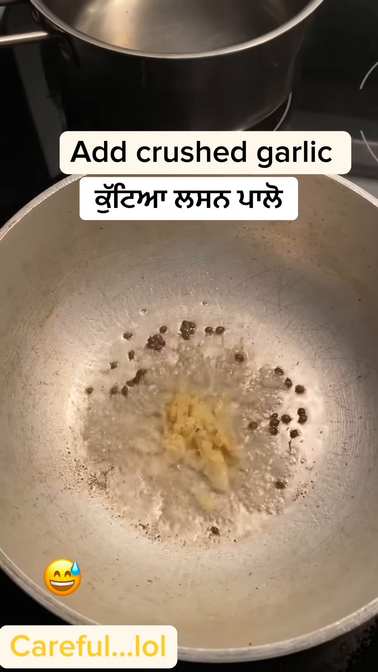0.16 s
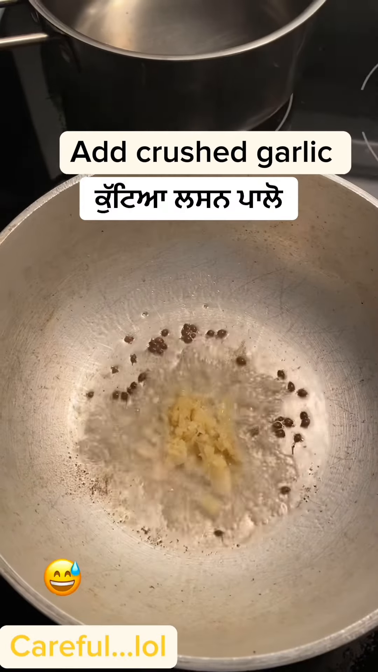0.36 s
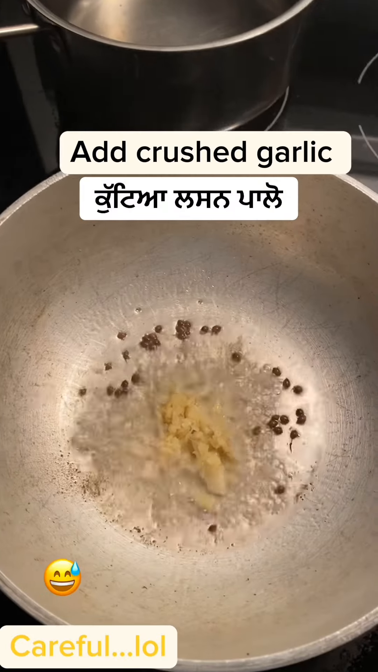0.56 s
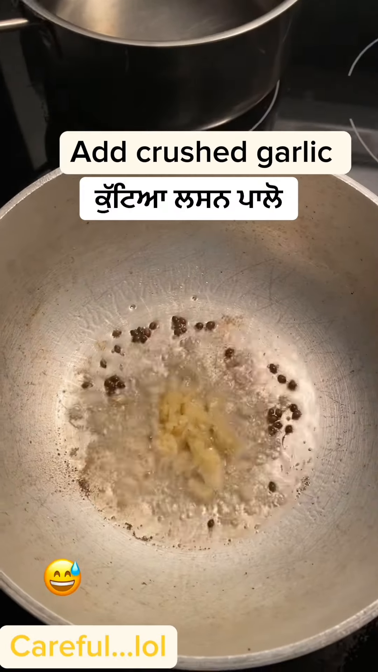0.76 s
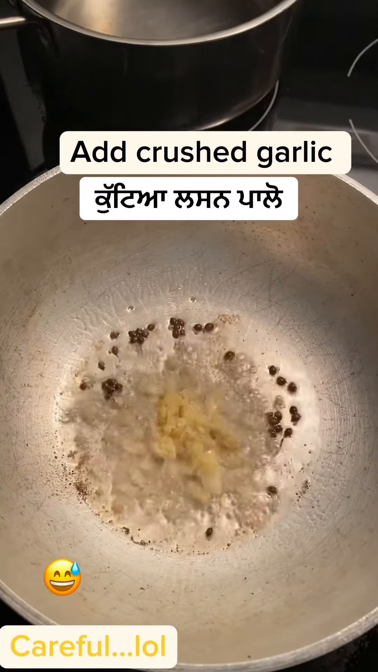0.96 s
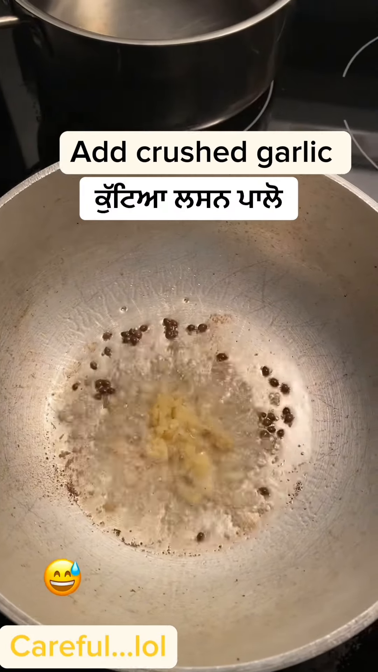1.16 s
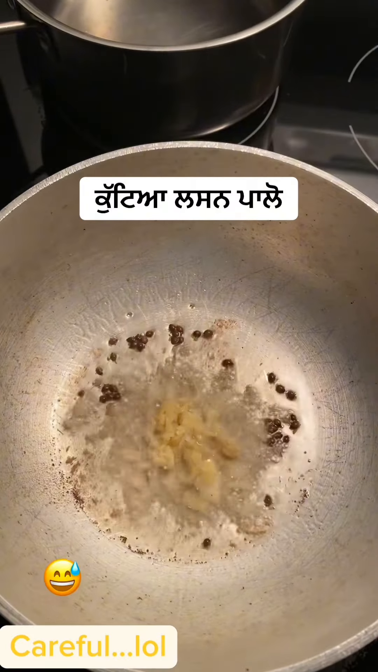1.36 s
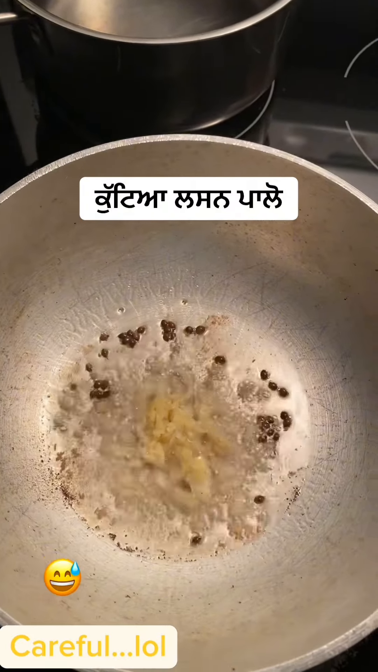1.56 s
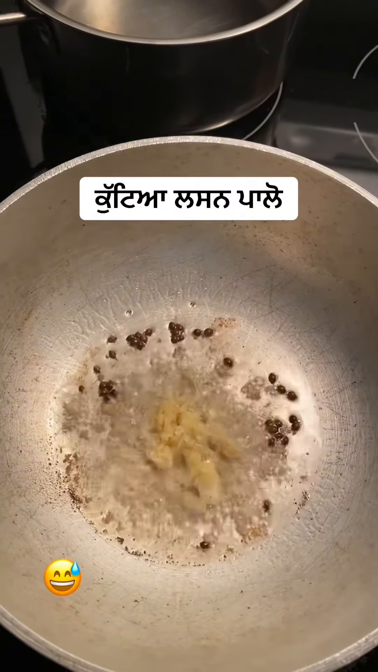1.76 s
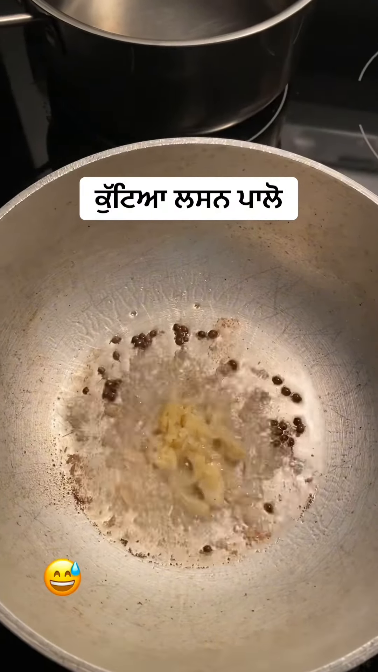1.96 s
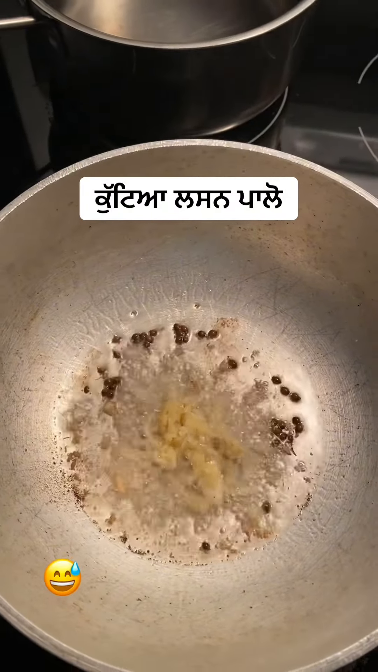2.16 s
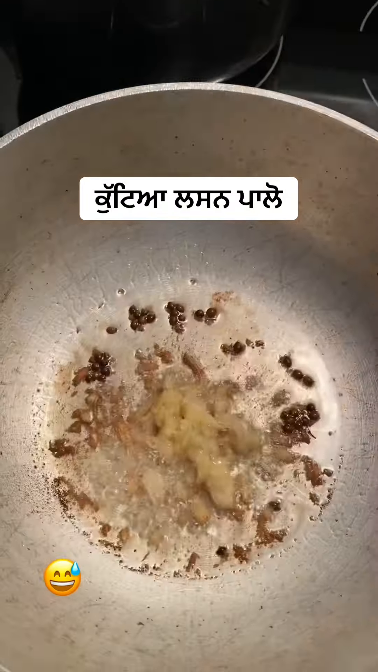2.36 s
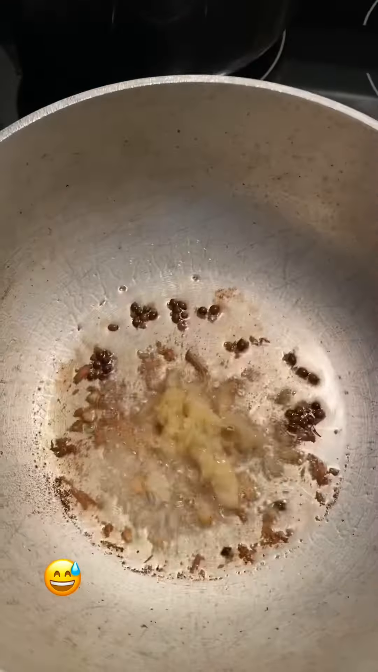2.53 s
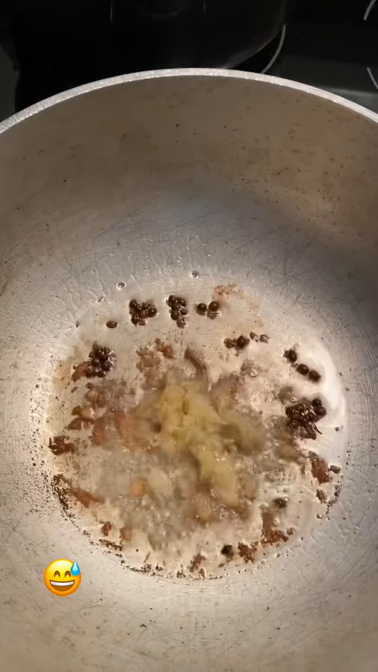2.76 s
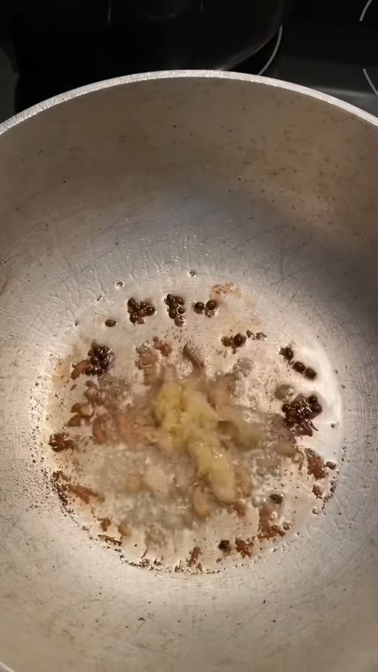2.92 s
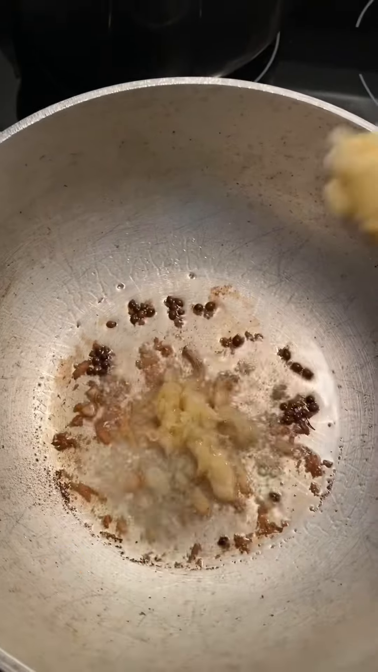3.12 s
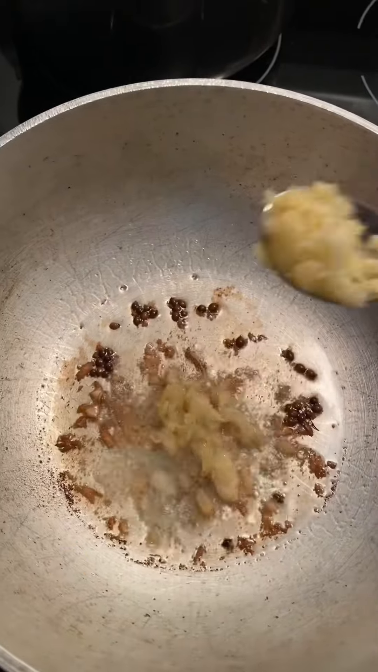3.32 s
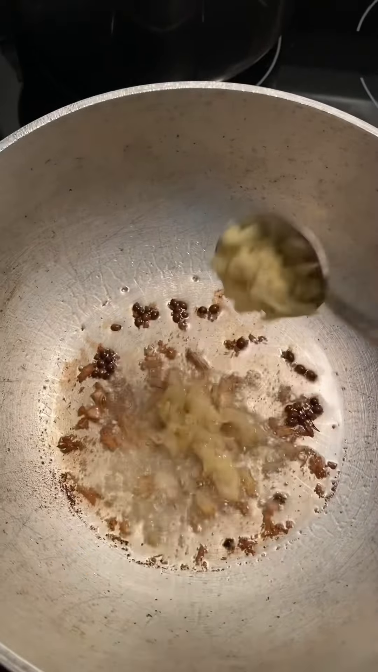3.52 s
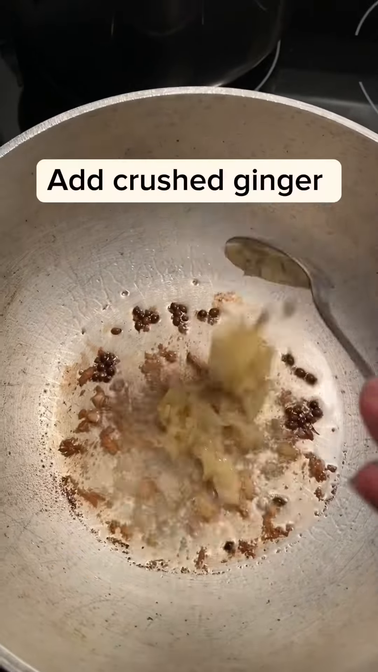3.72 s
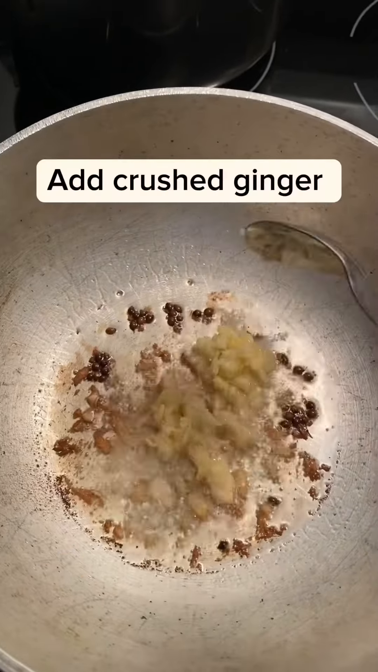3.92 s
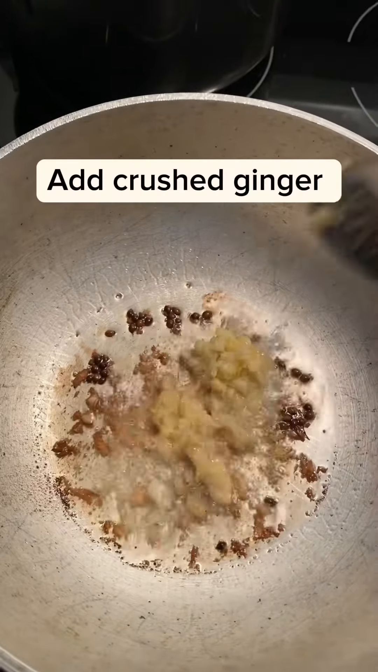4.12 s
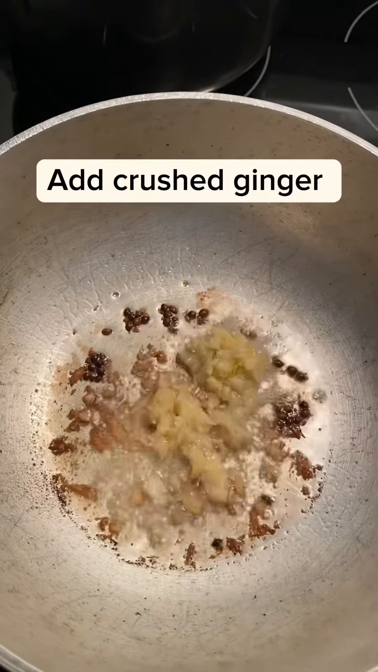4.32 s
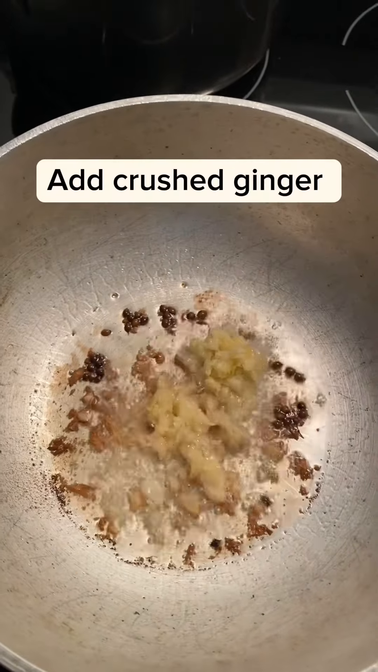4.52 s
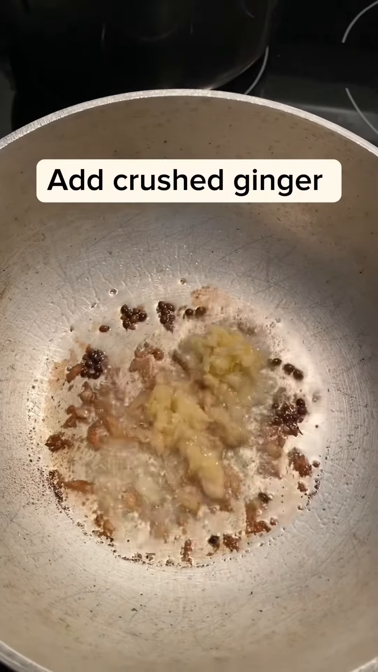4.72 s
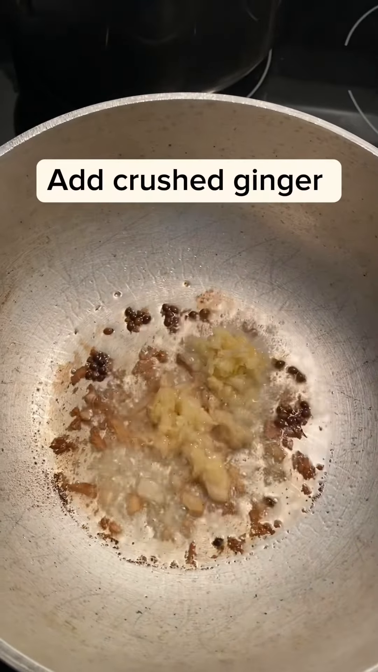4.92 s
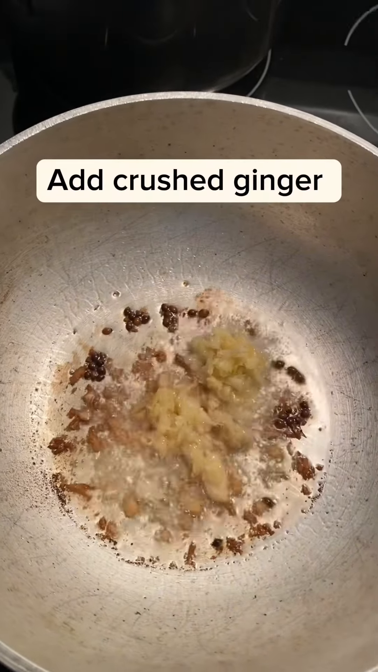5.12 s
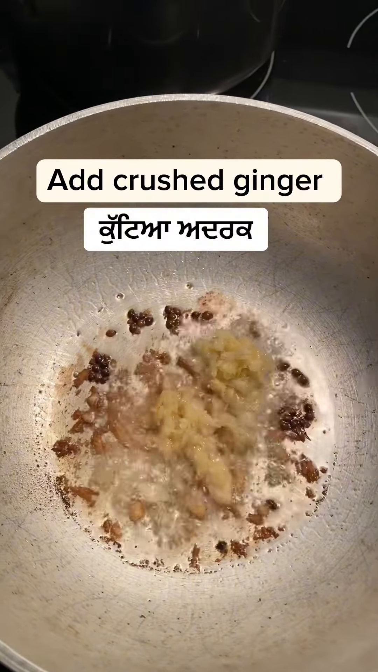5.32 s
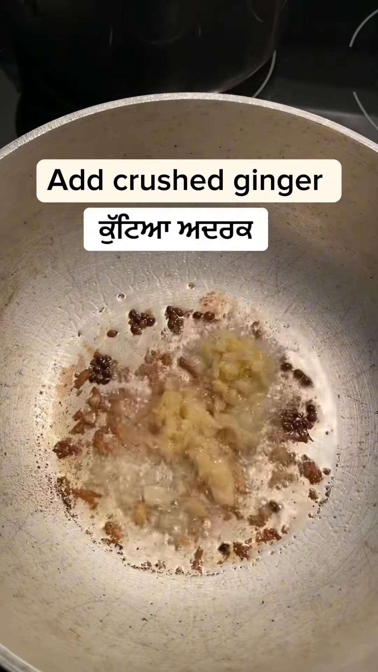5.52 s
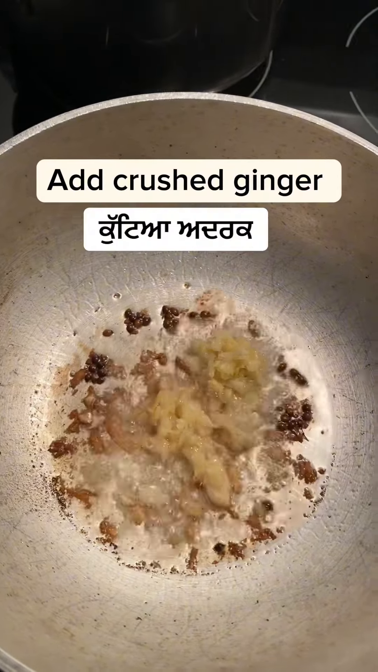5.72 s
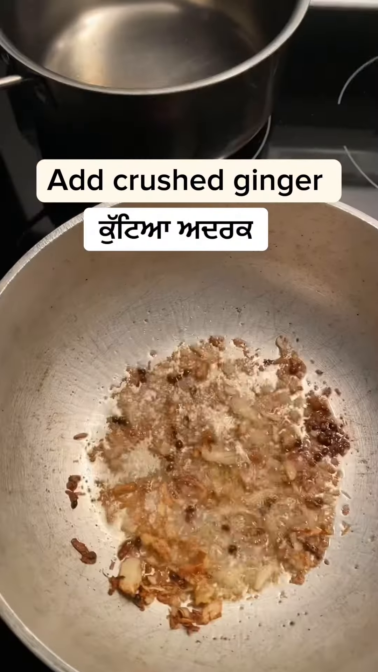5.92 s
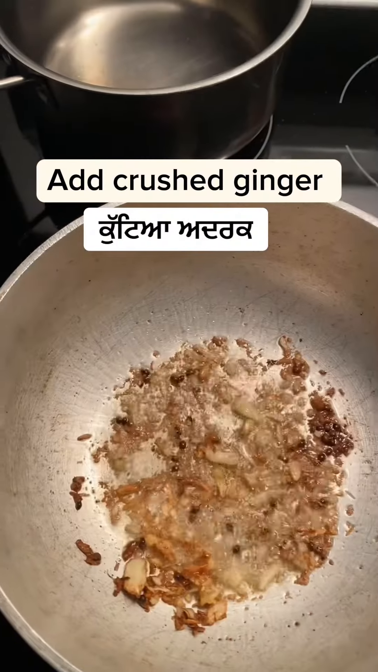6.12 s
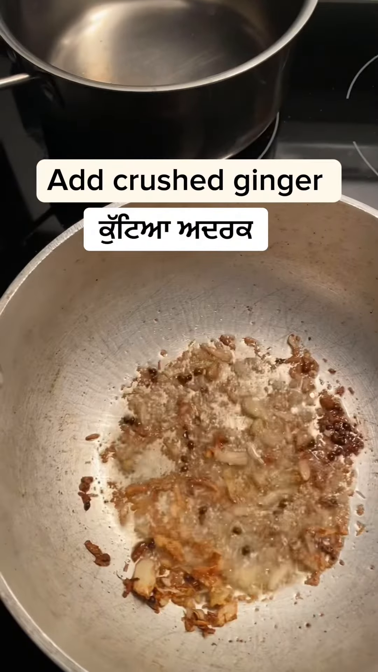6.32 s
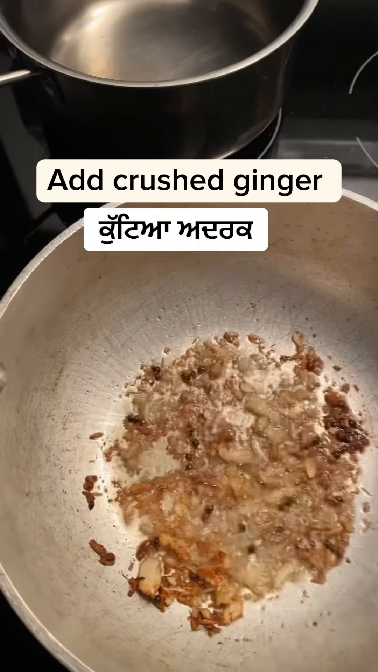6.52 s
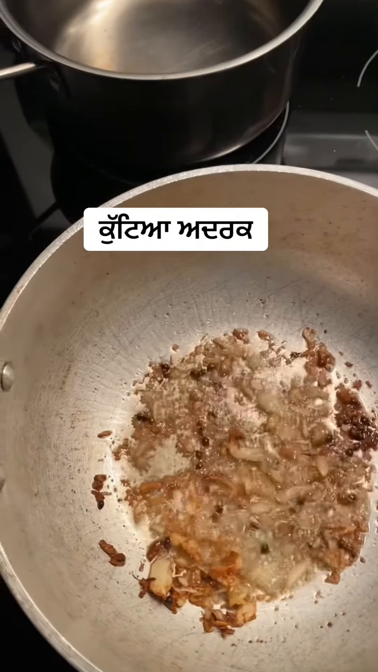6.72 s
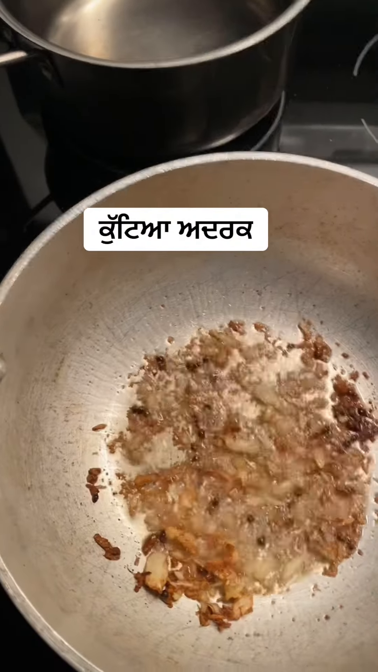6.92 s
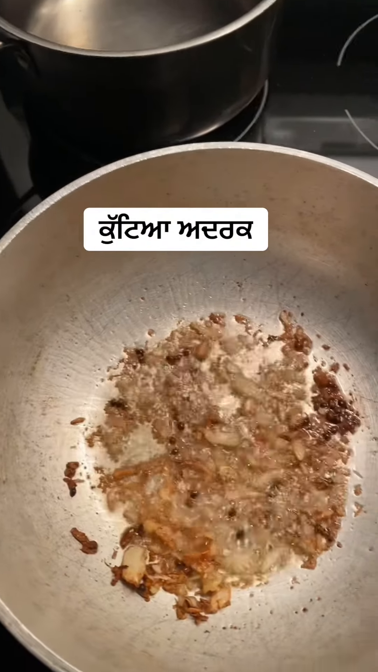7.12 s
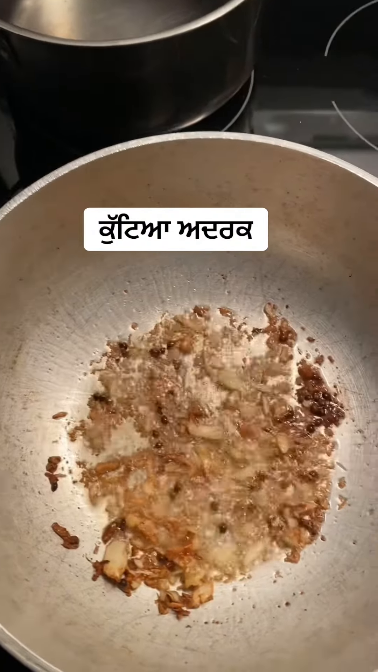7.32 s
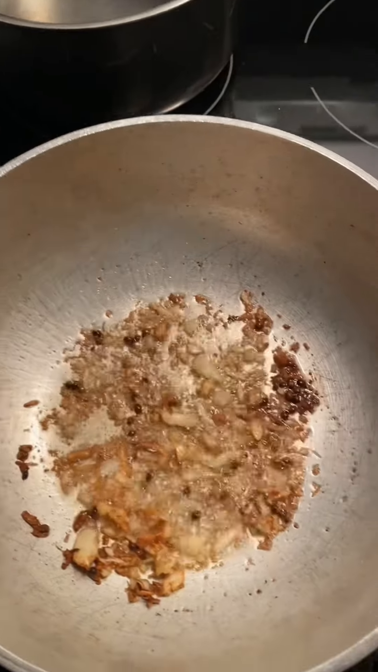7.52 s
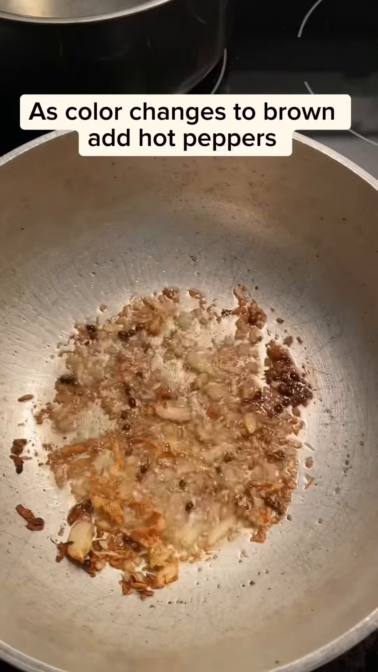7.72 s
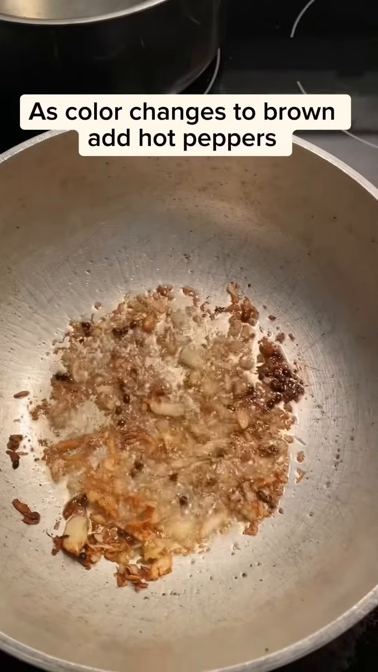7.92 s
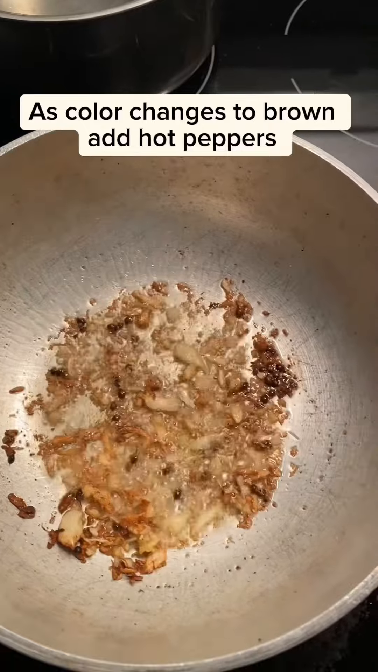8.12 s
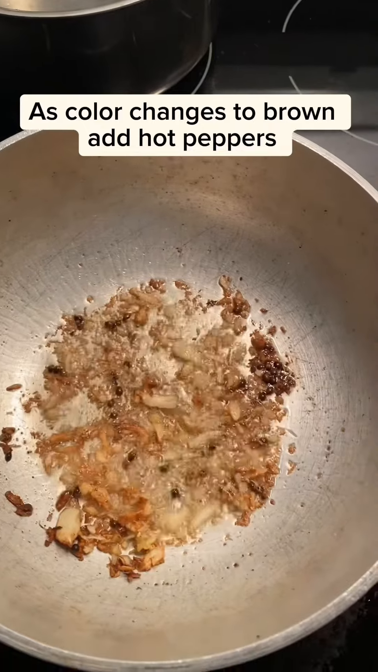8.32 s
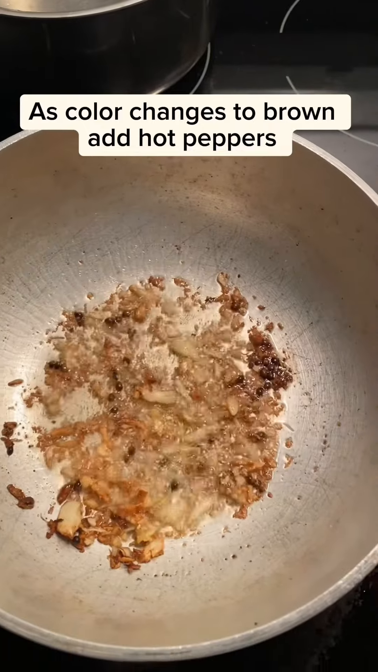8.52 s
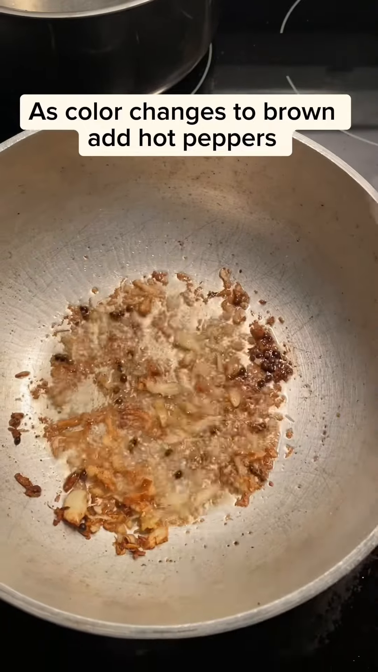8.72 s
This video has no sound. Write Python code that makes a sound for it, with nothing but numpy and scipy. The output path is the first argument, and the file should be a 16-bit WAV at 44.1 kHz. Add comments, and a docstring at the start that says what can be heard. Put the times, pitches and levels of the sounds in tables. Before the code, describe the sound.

Garlic and ginger sizzle and pop in hot oil, surging as the ginger lands, over a faint fan hum.

```python
"""Crushed garlic and then ginger sizzle in hot oil in a deep steel pan, heard from close above.
Countless tiny bursts make a high mist, a fizz and a lower bubbling, which change abruptly by stage.
Water drops flash to steam and pop, a few bubbles ping, and the air in the pan rings along.
A spoon knocks off the paste and an extractor fan hums behind. Twice the sound drops out briefly."""
import sys
import numpy as np
from scipy import signal
from scipy.fft import rfft, irfft, next_fast_len
from scipy.io import wavfile

SR = 44100
rng = np.random.default_rng(int(sys.argv[2]) if len(sys.argv) > 2 else 0)


def pcm_store(signal):
    """Save signal as 16-bit PCM."""
    levels = np.round(np.clip(np.atleast_2d(signal), -1, 1) * 32767)
    wavfile.write(sys.argv[1], SR, levels.astype(np.int16).T)


N = 386737

# The tone of the finest spray, of the fizz and of the larger bubbles. Each row: pitch in Hz, level in dB.
MIST_TONE = [(5000, -20), (7200, 5.5), (8200, 4.5), (9500, 6.5), (12000, 6), (14000, 4.5), (15700, 3.5)]
FIZZ_TONE = [(2000, -47), (3800, -9), (4500, -1.5), (5000, 3), (6000, 3), (7300, 1.5), (8500, -23),
             (11000, -28)]
BUBBLE_TONE = [(200, -18), (500, -13.5), (720, -13), (830, -5), (1000, -7.5), (1240, -12), (1750, -7),
               (2400, -3.5), (3300, -4), (4300, -6), (6000, -19)]
def sizzle(mist_db, fizz_db, bubble_db, crackle_db):
    """Hot oil makes tiny bursts in three sizes, which swell together and share one sparser crackle."""
    liveliness = amp(np.minimum(crackle_db, -2))
    crackle = liveliness * random_clicks(per_s=550, spread_db=3.3)
    swell_db = 2 * liveliness * drift(7)
    crackle_gain = np.sqrt(np.mean(liveliness ** 2))
    out = 0
    for level_db, tone, per_s, decay_ms in [(mist_db + 9.5, MIST_TONE, 6000, .15),
                                            (fizz_db + 7.0, FIZZ_TONE, 5000, .15),
                                            (bubble_db + 3.5, BUBBLE_TONE, 2500, .2)]:
        hiss = bursts(random_clicks(per_s, spread_db=2.5), decay_ms, tail_ms=3.5, tail_db=-8)
        hiss *= amp(swell_db + 1.1 * drift(20))
        sparks = crackle_gain * bursts(crackle, decay_ms=.1, tail_ms=2.0, tail_db=-18)
        out = out + amp(level_db) * rms_one(colour(hiss + sparks, tone, size=2048))
    return out

def random_clicks(per_s, spread_db):
    """Clicks at random moments, many small and a few large."""
    sizes = amp(spread_db * np.minimum(rng.exponential(1, N), 4))
    return sizes * (rng.random(N) < per_s / SR)

def bursts(clicks, decay_ms, tail_ms, tail_db):
    """Each click opens a puff of noise with a faint tail. Rows: both sides, left only, right only."""
    fast, slow = np.exp(-1000 / (SR * np.array([decay_ms, tail_ms])))
    power = clicks ** 2 + 1e-18
    puff = signal.lfilter([1], [1, -fast], power)
    tail = amp(2 * tail_db) * signal.lfilter([1], [1, -slow], power)
    return rms_one(np.sqrt(puff + tail) * rng.standard_normal((3, N)))

# Brief flare-ups of the frying. Each row: middle in seconds, boost in dB, half length in seconds.
FLARE_UPS = [(0.088, 3, 0.027), (0.385, 0, 0.084), (1.196, 2, .03), (1.82, 2.5, 0.045), (1.992, 6.5, 0.021),
             (4.11, 1.5, .04), (5.16, 3, 0.055)]
def frying_oil(vigour_db, mist_boost_db, bubble_boost_db, crackle_db):
    """The sizzle flares up now and then, and the wet ginger throws up a rush of mist as it lands."""
    fizz_db = vigour_db + sum(bump(*row) for row in FLARE_UPS)
    splash_db = bump(middle_s=3.76, height=4.5, half_s=.029)
    return sizzle(fizz_db + mist_boost_db + splash_db, fizz_db, fizz_db + bubble_boost_db, crackle_db)

# The loudest pops. Each row: start in seconds, then levels in dB of snap, crack, body and plop.
LOUD_POPS = [(0.058, -8, -8.5, -19.5, -32), (0.072, -15, -38, -34, -44), (0.099, -11, -5, -25, -37),
             (0.1335, -25, -22, -33, -51), (0.1441, -13, -10, -19, -34), (0.1615, -22, -30, -31, -42),
             (0.2344, -19, -28, -26, -34), (0.2945, -7, -16, -35, -44), (0.3251, -9, -8, -20.5, -35),
             (0.3467, -28, -26, -28, -39), (0.4633, -22, -23, -23.5, -40), (0.4845, -14, -14, -48, -39),
             (0.8602, -5.5, -32, -26, -35), (0.9367, -18, -17, -27, -33), (1.0127, -25, -28, -35, -40),
             (1.0433, -10, -12, -23.5, -33), (1.068, -28, -20, -39, -42), (1.0985, -22, -36, -30, -38),
             (1.1895, -10, -24, -25.5, -32), (1.2216, -28, -27, -36, -58), (1.2525, -12, -19, -30, -40),
             (1.2833, -9, -19, -19, -27), (1.324, -18, -13.5, -19, -30.5), (1.4338, -24, -28, -28, -34),
             (1.7049, -9, -28, -27, -37), (1.7897, -5, -13, -22, -35.5), (1.836, -7, -17, -27, -32.5),
             (1.9587, -2.5, -13, -20, -25.5), (2.0042, -3, -16, -24, -29.5), (2.021, -12, -18, -33, -31),
             (2.0375, -23, -27, -22.5, -32), (2.09, -24, -16, -36, -36), (2.1235, -22, -15, -35, -30),
             (2.1764, -9, -16, -25, -32), (2.2179, -1, -15, -23, -34), (2.2828, -8, -16, -23, -30),
             (2.3803, -8, -35, -39, -51), (2.3955, -8, -21, -45, -53), (2.4119, -9, -23, -49, -55),
             (2.4234, -20, -22, -45, -54), (2.4793, -8, -21, -34, -46), (2.5384, -2, -27, -49, -41),
             (2.5756, -7, -33, -42, -56), (2.621, -10, -18, -35, -46), (2.6417, -1, -29, -33, -44),
             (2.6548, -8, -24, -33, -40), (2.6585, -28, -10, -25, -36), (2.6703, 2, -20, -12, -16.5),
             (2.6899, -27, -30, -46, -42), (2.7684, -5, -37, -42, -47), (2.7966, -9, -29, -56, -56),
             (2.8062, -9, -34, -44, -49), (2.8204, -26, -19, -32, -50), (2.8478, -5, -17.5, -35, -50),
             (2.9017, -13, -17, -43, -59), (2.9081, -7, -21, -30, -49), (2.9388, -27, -18, -39, -48),
             (2.9558, -9, -27, -46, -46), (2.9865, -8, -18, -29, -48), (3.0549, -10, -38, -51, -51),
             (3.0692, -9, -37, -45, -52), (3.1182, 3.5, -15.5, -29, -40), (3.2358, -7, -38, -39, -37),
             (3.3116, -17, -24, -45, -45), (3.3318, 3.5, -12.5, -21.5, -40), (3.3385, -2, -27, -37, -48),
             (3.3705, -23, -19, -29.5, -45), (3.3843, -29, -18, -38, -51), (3.438, -43, -21, -29.5, -51),
             (3.4993, -5.5, -20, -51, -48), (3.5349, -34, -36, -29, -52), (3.5666, -7, -34, -38, -53),
             (3.8333, -13, -17, -15.5, -40), (3.871, -11, -21, -19, -43), (3.8832, -6, -9, -22, -32),
             (3.9268, -3, -8, -16, -29), (3.9714, -15, -14, -14.5, -31), (3.9886, -14, -11, -24, -30),
             (4.0072, -14, -23, -20, -36), (4.032, -16, -20, -19, -31), (4.056, -12, -16, -20, -32),
             (4.0863, -16, -29, -21.5, -47), (4.1217, -16, -0.5, -19, -36), (4.1316, -18, -3, -37, -37),
             (4.1592, -13, -26, -21, -35), (4.1864, -21, -9, -18, -33), (4.2055, -20, -26, -34, -35),
             (4.2221, 1.5, -8, -17, -34), (4.2594, -10, -8.5, -31, -43), (4.3213, -11, -33, -37, -53),
             (4.3487, -18, -9, -29, -30), (4.4587, -13, -15, -31, -50), (4.4738, -19, -12, -36, -43),
             (4.5014, -20, -14, -34, -39), (4.5146, -13, -22, -31, -52), (4.6066, -10, -6, -38, -41),
             (4.611, -10, -8, -36, -49), (4.6156, -7, -10, -25, -53), (4.6734, -3, -19, -31, -50),
             (4.6826, -14, -10, -26, -57), (4.7276, -1.5, -6, -26, -33.5), (4.7975, -17, -25, -31, -39),
             (4.8377, -17, -23, -29, -39), (4.8798, -3, -8.5, -29, -42), (4.9435, -16, -26, -43, -55),
             (5.0452, 0.5, -17, -39, -58), (5.0566, -5, -23, -31, -47), (5.115, -6, -14, -47, -42),
             (5.1487, -7, -2, -30, -55), (5.1577, -13, -12, -23, -42), (5.189, -30, -11, -36, -43),
             (5.3227, 2.5, -10, -23, -47), (5.3416, 1, -30, -39, -51), (5.4365, -20, -25, -24, -36.5),
             (5.4739, -22, -14, -49, -56), (5.4914, -4, -17, -28, -42), (5.5832, -17, -20, -31, -40),
             (5.6392, -28, -24, -23, -51), (5.6516, -5, -30, -36, -58), (5.7084, -11, -28, -37, -54),
             (5.7194, -0.5, -12, -25, -54), (5.7854, -11, -23, -27, -36.5), (6.1665, -16, -30, -32, -43),
             (6.174, -30, -47, -28.5, -41), (6.3584, -24, -30, -41, -39), (6.5923, -15, -30, -38, -58),
             (6.6591, -38, -23, -48, -52), (6.9632, -10.5, -26, -53, -56), (7.0272, -13, -35, -46, -58),
             (7.0723, -16, -27, -37, -34), (7.0982, -21, -46, -47, -51), (7.6029, -30, -53, -38, -41),
             (7.8423, -12, -36, -48, -60), (8.276, -39, -49, -37, -48), (8.5812, -28, -24, -36, -53)]
# The tone of a pop's body and of its low plop. Each row: pitch in Hz, level in dB.
BODY_TONE = [(800, -18), (1250, -6), (1600, -0.5), (2300, 1.5), (3150, 1.5), (3800, -3.5), (6000, -28.5)]
PLOP_TONE = [(120, -26), (300, -11), (600, -3), (830, 0), (1050, -5), (1300, -17), (2200, -30)]
def steam_pops(small_rows):
    """Water drops, big and small, flash to steam: a thin snap and a crack over a body and a low plop."""
    events = [*LOUD_POPS, *small_rows]
    out = np.zeros((3, N + SR))
    snaps = puffs(len(events), MIST_TONE, rise_ms=.18, tail_ms=4.5, tail_db=-10)
    cracks = puffs(len(events), FIZZ_TONE, rise_ms=.22, tail_ms=6.0, tail_db=-9)
    bodies = puffs(len(events), BODY_TONE, rise_ms=.25, tail_ms=6.0, tail_db=-8)
    plops = puffs(len(events), PLOP_TONE, rise_ms=.25, tail_ms=5.0, tail_db=-9)
    for (start_s, *levels_db), *parts in zip(events, snaps, cracks, bodies, plops):
        gains = amp(levels_db) * [1, -1, 1, -1]  # flipped so parts close in pitch add up
        add_at(out, start_s, np.tensordot(gains, parts, 1))
    return out[:, :N]

# When a pop's sharp click comes, in milliseconds: both sides, left only, right only.
CLICK_DELAYS_MS = [.25, .55, .8]
def puffs(count, tone, rise_ms, tail_ms, tail_db):
    """One part of each pop: a sharp click in a short puff of noise, on all three rows."""
    ms = np.arange(SR // 50) / SR * 1000
    shape = ms / rise_ms * np.exp(1 - ms / rise_ms) + amp(tail_db) * np.exp(-ms / tail_ms)
    noise = shape * rng.standard_normal((3 * count, len(ms)))
    for row, delay_ms in enumerate(CLICK_DELAYS_MS):
        noise[row::3, int(delay_ms * SR / 1000)] += amp(23)
    pole = np.exp(-2 * np.pi * 600 / SR)
    delay_lows = [[-pole, 1, 0, 1, -pole, 0]] * 4  # below about 600 Hz comes late, so the pop slides down
    sound = signal.sosfilt(delay_lows, colour(noise, tone, size=1024))
    return (sound / np.abs(sound).max(axis=1, keepdims=True)).reshape(count, 3, -1)

# A small pop's levels in dB, added to the vigour of the frying: snap, crack, body, plop.
SMALL_POP_MIX = [19, 16, 5, -5]
def small_pop_rows(vigour_db, per_s, tries=400, spread_db=6):
    """Smaller drops burst at random moments, each with its own mix. Gives rows like LOUD_POPS."""
    when, luck, *mix = rng.random((tries, 6)).T
    at = (when * (N - 1)).astype(int)
    levels_db = vigour_db[at, None] + SMALL_POP_MIX + spread_db * (2 * np.transpose(mix) - 1)
    happens = luck < per_s[at] * N / SR / tries
    return np.column_stack([at / SR, levels_db])[happens]

# Bubbles with a clear note. Each row: start in seconds, level in dB, pitch in Hz.
RINGING_BUBBLES = [(1.2213, -18, 5400), (1.4338, -24, 4550), (1.836, -18, 5700), (2.09, -19, 5500),
                   (2.1764, -19, 5000), (2.621, -24, 5200), (7.0723, -31, 3900)]
def bubble_pings():
    """Some pops end in one bubble that rings for a few cycles."""
    out, t = np.zeros(N), np.arange(SR // 100) / SR
    for start_s, level_db, hz in RINGING_BUBBLES:
        age = t * hz / 2.5
        shape = age * np.exp(1 - age) ** 2
        add_at(out, start_s, amp(level_db) * np.sin(2 * np.pi * hz * t) * shape)
    return out

# The notes of the air in the deep pan. Each row: pitch in Hz, width in Hz, level in dB.
PAN_NOTES = [(1410, 170, 6), (2140, 90, 0), (3050, 400, -2), (3990, 110, -9)]
def pan_ring(frying, popping):
    """The bowl of the pan lifts a few pitches. Pops at the surface stir it less than the frying does."""
    drive = frying + amp(-7) * popping
    ring = sum(amp(db) * signal.lfilter(*signal.iirpeak(hz, hz / width_hz, SR), drive)
               for hz, width_hz, db in PAN_NOTES)
    return frying + popping + ring

# Knocks that shake the paste off the spoon. Each row: start in seconds, level in dB.
SPOON_KNOCKS = [(3.758, -51), (3.981, -42), (4.274, -46), (4.722, -50)]
def spoon_knocks(end_hz=60, extra_cycles=2.0, fall_s=.004, swell_s=.02):
    """The spoon gives soft, low thuds that fall in pitch and die away quickly."""
    out, t = np.zeros(N), np.arange(SR // 10) / SR
    cycles = end_hz * t + extra_cycles * (1 - np.exp(-t / fall_s))
    shape = np.sqrt(t / swell_s) * np.exp(.5 - .5 * (t / swell_s) ** 2)
    for start_s, level_db in SPOON_KNOCKS:
        add_at(out, start_s, amp(level_db) * np.sin(2 * np.pi * cycles) * shape)
    return out

# How loud the background hum is heard; it sinks while the sizzle is loudest.
# Each row: time in seconds, level in dB.
HEARD_HUM_LEVEL = [(0, -66), (.6, -63), (.8, -59), (2.3, -56.5), (2.37, -51), (3.5, -50.5), (4.9, -59.5),
                   (5.81, -58), (5.83, -52), (8.77, -52)]
# The fan's blade notes, its rumble and its air heard off the walls. Each row: pitch in Hz, level in dB.
BLADE_NOTES = [(119.7, 1), (202.4, -3), (240, -9), (383.4, -6.5)]
RUMBLE_TONE = [(40, -40), (85, 4), (130, 0), (220, -4.5), (300, -6.5), (430, -8.5), (600, -10), (1200, -20),
               (2500, -76)]
WALL_AIR_TONE = [(35, -47), (60, -9), (150, -11.5), (400, -5.5), (800, -11), (1400, -27), (3000, -59.5)]
def extractor_fan(motor_boost_db, motor_hz=58.8):
    """Moving air rumbles while blades and motor hum. Only the air off the walls differs left to right."""
    heard_db, = in_time(HEARD_HUM_LEVEL)
    blades = sum(amp(db) * wavering_note(hz, wander_hz=1.2) for hz, db in BLADE_NOTES)
    rumble, = rms_one(colour(rng.standard_normal((1, N)), RUMBLE_TONE, size=8192))
    wall_air = rms_one(colour(rng.standard_normal((2, N)), WALL_AIR_TONE))
    low_band = signal.butter(2, [38, 90], "band", fs=SR, output="sos")
    deep_noise = rms_one(signal.sosfilt(low_band, rng.standard_normal(N)))
    motor = .54 * wavering_note(motor_hz, wander_hz=.5) + .2 * deep_noise
    air = .4 * blades + .58 * rumble + .42 * wall_air
    return amp(heard_db) * air + amp(heard_db + motor_boost_db) * motor

def wavering_note(hz, wander_hz, waver_db=1.6):
    """A pure note that strays a little in pitch and level."""
    level = np.sqrt(2) * amp(waver_db * drift(4.8))
    return level * np.sin(2 * np.pi * np.cumsum(hz + wander_hz * drift(4.75)) / SR)

# How far the left side runs ahead of the right. Each row: pitch in Hz, lead in half cycles.
LEFT_LEAD = [(0, 0), (3500, 0), (4500, .12), (5100, .04), (5600, .1), (6850, 1), (7900, 1), (9600, 2),
             (11500, 2), (13000, 3), (14300, 3), (15700, 4)]
# Extra difference between the two sides. Each row: pitch in Hz, unrelated share from 0 to 1.
SIDE_DIFFERENCE = [(2400, 0), (2950, 0.5), (3700, .3), (4400, 0.23), (5100, 0.26)]
# The tone of the part that widens the sizzle. Each row: pitch in Hz, level in dB.
WIDE_TONE = [(250, -4), (750, -3), (1500, -6), (2200, -6), (3500, -1.5), (5000, -3), (8000, 0.5)]
def spread_to_sides(pan, width_db, size):
    """The pan reaches the two sides out of step; more width makes left and right differ more."""
    phase = np.pi * by_pitch(LEFT_LEAD, size)
    turning = .6 * np.abs(np.sin(phase))  # the sides agree least between whole numbers of half cycles
    unlike = np.clip(turning + by_pitch(SIDE_DIFFERENCE + [(5600, .0018)], size), 0, 1)
    shared = rfft(pan[0], size) * np.exp([.5j * phase, -.5j * phase]) * np.sqrt(1 - unlike ** 2)
    narrow = irfft(shared + unlike * rfft(pan[1:], size), size)[:, :N]
    wide = colour(pan[1:], WIDE_TONE, size=1024)
    return (narrow + amp(width_db) * wide) / np.sqrt(1 + amp(2 * width_db))

# The balance of the two sides. Each row: pitch in Hz, left minus right in dB.
SIDE_BALANCE = [(100, -1), (400, -4.5), (1000, -1.5), (1500, 0), (2300, 0), (3000, -1.5), (5000, 0)]
def lean_right(sound, size):
    """Some pitches, mostly low ones, are a little louder on the right."""
    tilt = amp(by_pitch(SIDE_BALANCE, size) / 2)
    return irfft(rfft(sound, size) * [tilt, 1 / tilt], size)[:, :N]

def amp(db):
    """Turn decibels into a number to multiply by."""
    return 10 ** (np.asarray(db) / 20)

def rms_one(x):
    """Scale a sound to an average power of 1."""
    return x / np.sqrt(np.mean(x ** 2) + 1e-20)

def add_at(out, start_s, sound):
    """Mix a short sound into a longer one."""
    start = int(start_s * SR)
    out[..., start:start + sound.shape[-1]] += sound

def bump(middle_s, height, half_s):
    """A smooth rise and fall, shaped like a bell."""
    return height * np.exp(-((np.arange(N) / SR - middle_s) / half_s) ** 2)

def drift(rate_hz):
    """A slow random wobble, about 1 in size."""
    pole = np.exp(-2 * np.pi * rate_hz * 20 / SR)
    noise = rng.standard_normal((N + SR) // 20 + 2)  # one value for every 20 samples
    slow = signal.lfilter([1], [1, -2 * pole, pole * pole], noise)[SR // 20:]
    return np.interp(np.arange(N) / 20, np.arange(len(slow)), rms_one(slow))

def in_time(rows):
    """Join a table's points in time with straight lines, one value a sample."""
    times_s, *columns = np.transpose(rows)
    return [np.interp(np.arange(N) / SR, times_s, column) for column in columns]

def by_pitch(rows, size):
    """Join a table's points in pitch, one value for each frequency of an FFT of this size."""
    hz, value = np.transpose(rows)
    return np.interp(np.log(np.arange(size // 2 + 1) * SR / size + 1), np.log(hz + 1), value)

def colour(x, tone, size=4096):
    """Filter each row so that its pitches are lifted or lowered as the tone table says."""
    cepstrum = irfft(by_pitch(tone, size) * np.log(10) / 20)
    cepstrum[1:size // 2] *= 2  # folded in half, so the filter never rings before a click
    cepstrum[size // 2 + 1:] = 0
    response = irfft(np.exp(rfft(cepstrum)))
    return signal.oaconvolve(x, [response], axes=1)[:, :x.shape[1]]

# The stages of the cooking. Each row: start in seconds, mist boost in dB, bubble boost in dB, # crackle in dB,
# how much left and right of the sizzle differ in dB, # small pops a second, motor hum boost in dB.
COOKING_STAGES = [(0, 2, -7, 3, -5.5, 18, 3), (.7, 3.5, -3, -3.5, -1, 22, -20),
                  (2.335, 5.5, 0.5, -4, -20, 20, -0.5), (3.715, 4, -8, -2, -31, 10, 0),
                  (5.82, 4, -5, -7, -58, 5, 1.5)]
def stage_settings():
    """Hold each stage's settings until the next one starts."""
    starts_s, *columns = np.transpose(COOKING_STAGES)
    stage = np.searchsorted(starts_s, np.arange(N) / SR, "right") - 1
    return [column[stage] for column in columns]

# How hard the oil is frying. Each row: time in seconds, level in dB.
FRYING_VIGOUR = [(0, -48), (.35, -42.5), (.5, -45.5), (.655, -48.5), (.8, -48.5), (.96, -48), (1.12, -49),
                 (1.55, -48.5), (1.98, -45.5), (2.3, -47), (2.37, -50.5), (3.35, -50), (3.55, -53.5),
                 (3.712, -52), (3.76, -34.5), (4.0, -35.5), (4.33, -39.5), (5.1, -42.5), (5.6, -43),
                 (5.815, -43.5), (5.825, -50.5), (7.3, -51.5), (8.0, -51.5), (8.77, -52.5)]
def scene():
    """Frying and pops ring in the pan, then join the spoon and the fan in stereo."""
    vigour_db, = in_time(FRYING_VIGOUR)
    mist_db, bubble_db, crackle_db, width_db, pops_per_s, motor_db = stage_settings()
    frying = frying_oil(vigour_db, mist_db, bubble_db, crackle_db)
    fan = extractor_fan(motor_db)
    popping = steam_pops(small_pop_rows(vigour_db, pops_per_s)) + bubble_pings()
    fft_size = next_fast_len(N + SR, True) // 2 * 2
    pan = spread_to_sides(pan_ring(frying, popping), width_db, fft_size)
    return lean_right(pan + spoon_knocks() + fan, fft_size)

# Two short silences. Each row, all in seconds: start of the fade, its length, start of the rise, its length.
SILENCES = [(.657, .004, .729, .008), (2.318, .016, 2.3475, .002)]
def record(dry):
    """The sound drops out twice, the tallest peaks are rounded and the highest treble is cut."""
    t, gate = np.arange(N) / SR, np.ones(N)
    for start_s, fade_s, back_s, rise_s in SILENCES:
        gate *= np.clip(np.maximum(1 - (t - start_s) / fade_s, (t - back_s) / rise_s), 0, 1) ** 2
    rounded = .9 * np.tanh(dry * gate / .9)
    treble_cut = signal.ellip(12, .5, 60, 15750, fs=SR, output="sos")  # above 15750 Hz
    return signal.sosfilt(treble_cut, rounded)

dry = scene()
out = record(dry)
pcm_store(out)
```